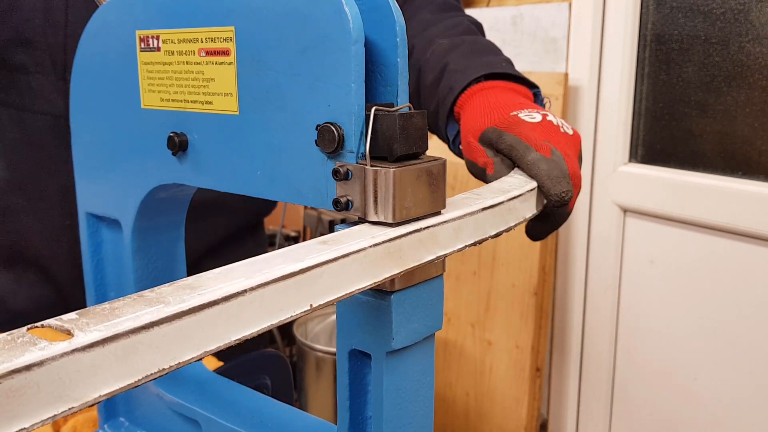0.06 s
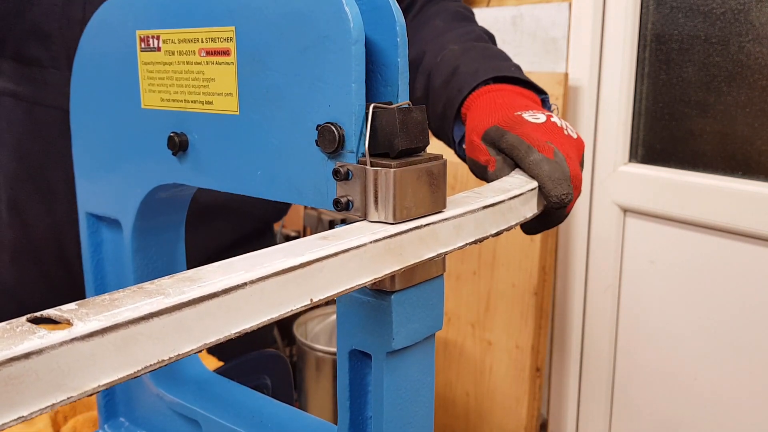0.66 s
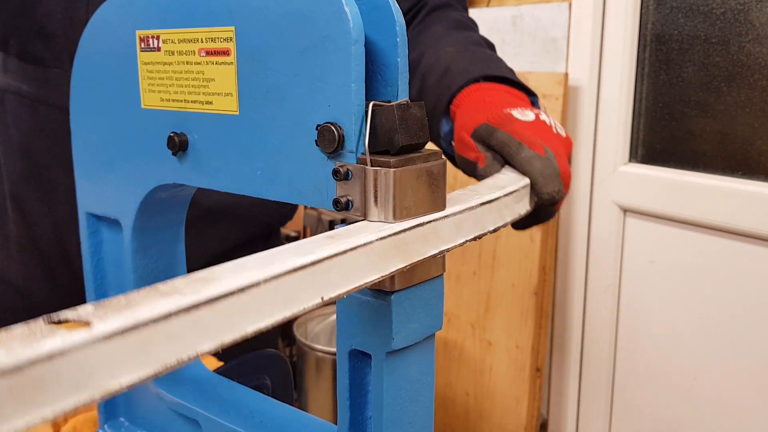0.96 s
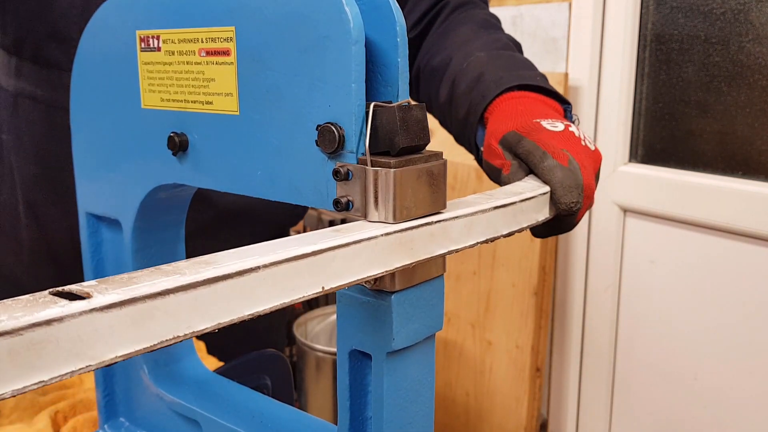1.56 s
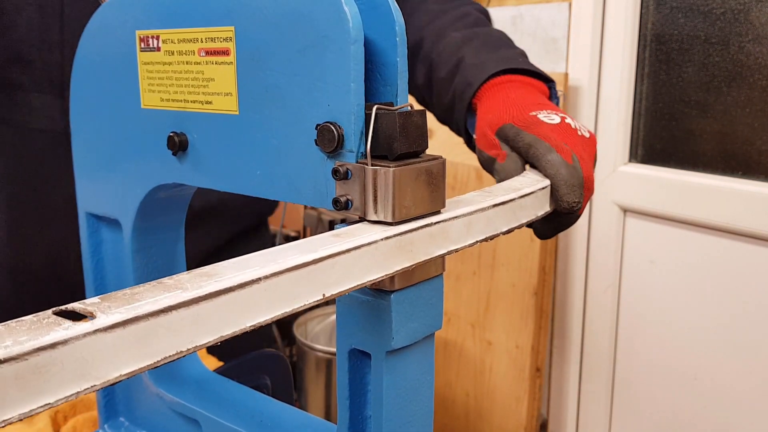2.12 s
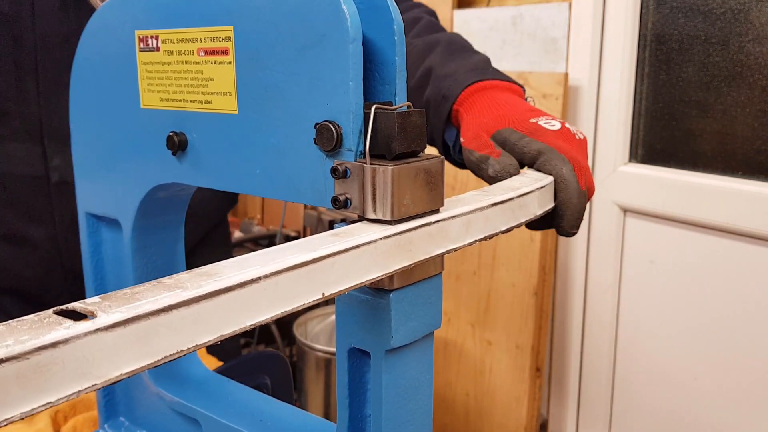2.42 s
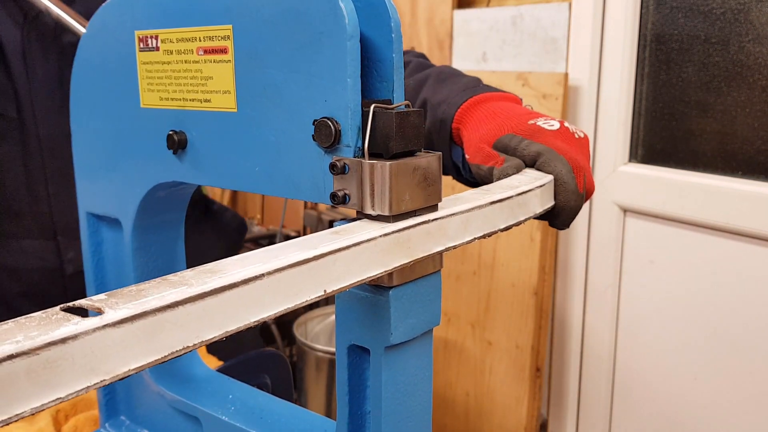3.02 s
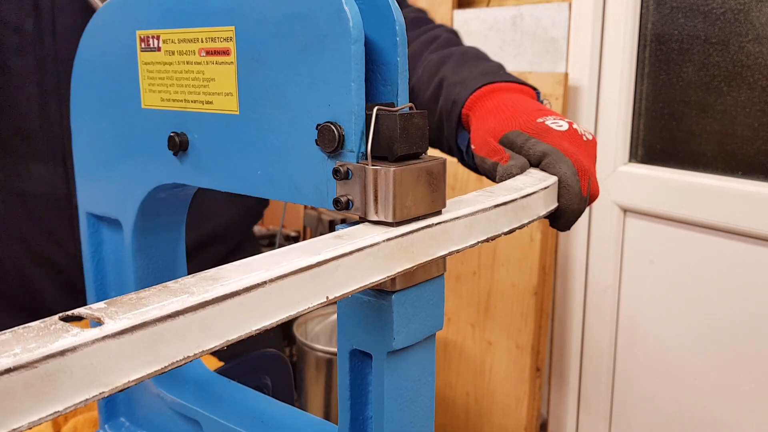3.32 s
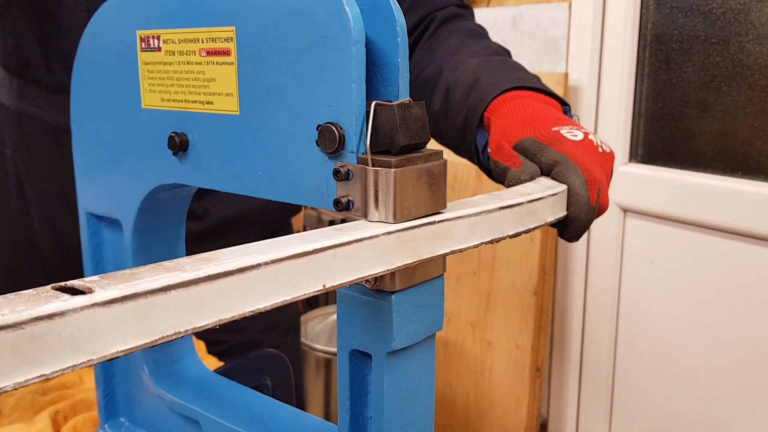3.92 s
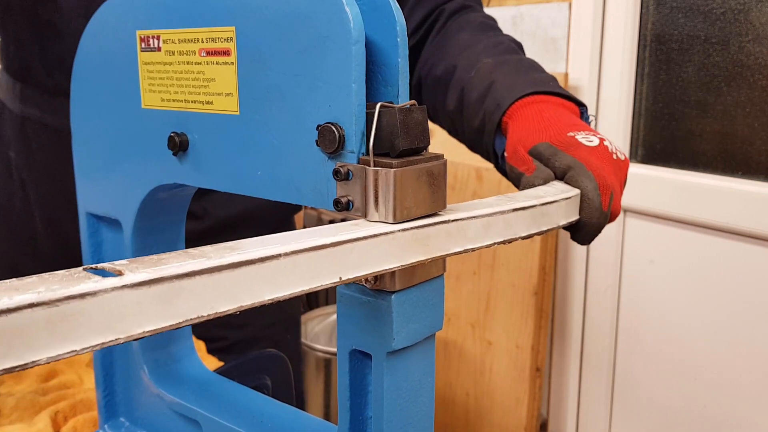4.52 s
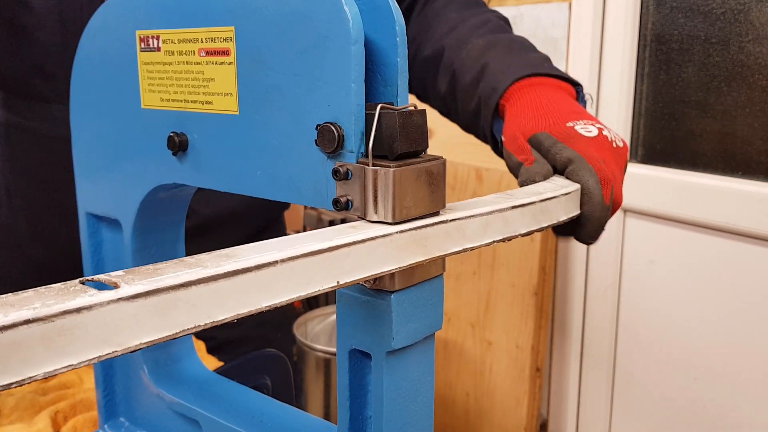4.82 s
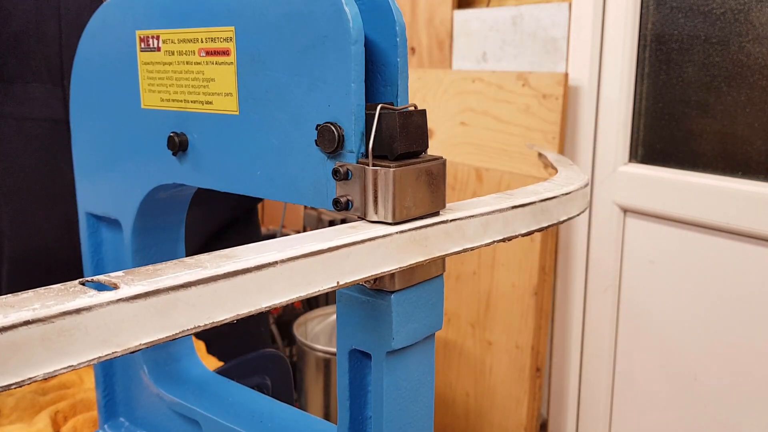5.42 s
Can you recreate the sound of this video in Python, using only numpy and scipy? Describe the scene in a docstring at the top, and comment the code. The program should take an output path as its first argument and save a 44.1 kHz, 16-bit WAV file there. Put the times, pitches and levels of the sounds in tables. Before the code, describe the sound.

A pedal-worked press bends a light metal profile, heard close in a small workshop. After a soft thud and a brief scrape, the steel jaws bite with a sharp double clunk and a low boom, then tick as the metal gives. The profile slides, with a clink, a thin squeal and a low pedal groan. Two more sharp clunks follow with a clink between them, ending in light ticks and a faint rising creak.

```python
"""Shrinker-stretcher in a small workshop

A pedal-worked press bends a light metal profile. On each hard stroke the steel jaws bite with
a clunk, then tick and creak as the metal gives; the cast frame thuds on its stand. Between
strokes the profile slides along the jaws with a hiss and one short squeal, loose jaw parts
clink and the pedal pivot groans."""
import sys
import numpy as np
from scipy import signal
from scipy.fft import rfft, irfft
from scipy.io import wavfile
from scipy.ndimage import uniform_filter1d

SR = 44100
rng = np.random.default_rng(int(sys.argv[2]) if len(sys.argv) > 2 else 0)


def file_out(sig):
    """Save sig as 16-bit WAV at sys.argv[1]."""
    # one column per channel
    cols = np.atleast_2d(sig).T
    # limit, then scale
    lim = np.clip(cols, -1, 1)
    pcm = np.round(lim * 32767).astype(np.int16)
    wavfile.write(sys.argv[1], SR, pcm)


N = 250002
T = np.arange(N) / SR
RING_T = T[:SR]  # one second for a hit to ring out

# room tone spectrum: f/Hz, level/dB
ROOM_COLOUR = [(25, -7.5), (50, -0.5), (85, 3.5), (200, -14.5), (400, -20), (800, -23.5), (1600, -25),
               (4000, -28.5), (7000, -23.5), (10000, -25), (15500, -30)]
# modes of the clamped profile: f/Hz, level/dB
PROFILE_MODES = [(406, -8.5), (550, -5.5), (592, -2.5), (680, -4.5), (710, -3.5), (923, 2), (1023, -9.5),
                 (1130, -3.5), (1530, 4), (1890, -8), (1974, -4.5), (2028, -7), (2159, -8), (2325, -2.5),
                 (2548, 3), (2900, 1.5), (3015, -3), (3893, 2.5), (4175, -3.5), (4730, -7), (6287, -8.5)]
# steel-on-steel spectrum: f/Hz, level/dB
STEEL_COLOUR = [(150, -5.5), (380, -7.5), (480, -9), (700, -6), (1100, 0.5), (1600, 2.5), (3200, 1.5),
                (4200, -2), (5500, -11.5), (7000, -13), (9500, -19), (11000, -32.5), (12800, -31),
                (15500, -45.5)]
# the jaws bite: t/s, crack level/dB, ring level/dB, tilt/(dB/octave), jaw f/Hz, jaw level/dB
JAW_BITES = [(.006, -41, -35, -6, 1640, -26.5), (0.0723, -55, -52, -2, 1630, -28.5),
             (.8659, -21.5, -25, 1, 3350, -22), (0.8904, -21.5, -26, -4, 3060, -16.5),
             (.923, -33, -32, -7.5, 661.5, -22), (3.541, -22, -29, 3, 6760, -19.5),
             (3.5429, -20.5, -28, 1.5, 2890, -16), (3.7496, -24, -32.5, -0.5, 3004, -11.5),
             (4.0123, -57, -38.5, -4, 990, -26.5), (4.472, -57, -48, -4, 1100, -35.5)]
# the metal slips between the loaded jaws: t/s, crack level/dB, jaw f/Hz, jaw level/dB
JAW_SLIPS = [(1.015, -38, 2980, -29), (1.0253, -31.5, 3580, -26), (1.0985, -38, 3015, -24),
             (1.2039, -47.5, 2950, -35.5), (1.2256, -47, 2840, -31), (1.236, -44.5, 2940, -33.5),
             (1.256, -43.5, 3130, -36.5), (1.3159, -45, 3310, -38.5), (3.958, -44.5, 2770, -33.5),
             (3.9866, -46, 2600, -38), (4.0048, -42, 2780, -23), (4.0717, -41, 3230, -29.5),
             (4.091, -58, 3340, -35), (4.143, -43, 3000, -34), (4.1488, -37.5, 3440, -32.5),
             (4.2122, -45, 3140, -36), (4.508, -37.5, 3030, -29.5)]
# pedal and linkage thuds: t/s, level/dB, hardness/(dB/octave)
PEDAL_THUDS = [(0.019, -30, 1), (0.084, -29, -2), (0.153, -48.5, -8.5), (0.894, -18.5, -1.5),
               (0.921, -32.5, 3.5), (1.291, -41, 13), (1.866, -40, 2.5), (2.117, -30, 3),
               (2.391, -35.5, -6), (2.855, -46, 14.5), (3.178, -42, -13.5), (3.425, -31, 0.5),
               (3.551, -34, 7), (3.769, -32, 7.5), (4.142, -37, 0), (4.184, -33, 7), (4.6, -38, 13.5)]
# modes of the frame on its stand: f/Hz, level/dB, t60/s
FRAME_MODES = [(68.2, -4.5, 1), (98.05, 5, 0.23), (115.5, 0.5, 0.21), (161.8, -3, 0.32), (191, -6.5, 0.33),
               (237.5, -15.5, 0.33)]
# spectrum of the stand's rumble: f/Hz, level/dB
STAND_COLOUR = [(25, -34.5), (48, -14.5), (66, 6.5), (82, 2), (102, 6), (135, -9.5), (175, -7.5),
                (240, -17.5), (400, -23.5), (700, -57.5)]
# long pedal pushes, one envelope each: t/s, grind level/dB, shake level/dB
PEDAL_STROKES = [
    [(0.98, -50, -46), (1.04, -42.5, -37), (1.154, -47, -41.5), (1.28, -45.5, -42.5), (1.682, -90, -58.5),
     (1.85, -80, -59)],
    [(3.46, -63, -37.5), (3.516, -85, -49), (3.548, -46.5, -33.5), (3.728, -51, -49.5), (3.768, -39.5, -41),
     (3.944, -60, -49), (3.96, -61, -50)],
    [(3.96, -46, -52), (3.986, -50, -59), (4.014, -42, -46), (4.078, -46, -40), (4.422, -49.5, -50),
     (4.682, -58.5, -46), (4.95, -97.5, -66.5)],
]
# the profile is shoved along the open jaws: t/s, attack/s, hold/s, hiss level/dB, grind level/dB
PROFILE_SHOVES = [(0.063, 0.017, 0.036, -37, -62), (1.901, 0.049, .005, -65.5, -64),
                  (2.105, .008, .03, -59, -52.5), (2.117, 0.041, 0.013, -49.5, -71),
                  (2.263, 0.029, 0.027, -56, -57), (2.341, 0.023, 0.039, -50, -69),
                  (2.44, 0.025, 0.046, -67, -80), (2.831, 0.037, 0.027, -64, -58),
                  (3.384, 0.025, 0.022, -71, -58.5), (4.796, 0.019, .035, -63.5, -92),
                  (4.962, 0.029, 0.014, -71, -70)]
# hiss spectrum of sliding metal: f/Hz, level/dB
SLIDE_COLOUR = [(150, 7.5), (350, 0), (600, -3.5), (1200, -6), (1480, -1), (1650, 5), (1850, -4),
                (2500, -1.5), (3700, 0.5), (5200, -12), (7000, -21), (10000, -33), (15000, -50)]
# grind spectrum of yielding metal: f/Hz, level/dB
YIELD_COLOUR = [(150, 12), (280, -7.5), (380, 9), (520, -1.5), (720, 1.5), (1100, 2), (1600, -6.5),
                (2300, -20.5), (3000, -9), (4000, -13.5), (5500, -25), (9000, -26), (15000, -56)]
# loose parts clink: t/s, level/dB, part (0 jaw block, 1 spring clip)
PART_CLINKS = [(2.3479, -26.5, 0), (3.3973, -44.5, 1), (3.424, -50.5, 1), (3.4824, -59, 1),
               (3.6658, -25.5, 1)]
# modes of the jaw block: f/Hz, level/dB, t60/s
BLOCK_MODES = [(1610, -12, 0.18), (2410, -17, 0.28), (2490, 8, 0.064), (2710, -12, 0.32), (2950, -1, 0.059),
               (3240, -1, 0.05), (3800, -8, 0.2), (4040, 5.5, 0.052), (4104, -6, 0.16), (4450, -13, 0.23),
               (12200, -36, 0.068)]
# modes of the spring clip: f/Hz, level/dB, t60/s
CLIP_MODES = [(2850, -14, .04), (3424, -16, .2), (3558, -14, .2), (4247, -19, .14), (4705, -9, .1),
              (5200, 2, .016), (5600, 3, .018), (6051, -14, .12), (8900, -8, .013), (12190, -8, .013)]
# squeal of the profile drawn over the lower jaw: t/s, f/Hz, level/dB
PROFILE_SQUEAL = [(2.35, 2345, -60), (2.375, 2335, -48), (2.49, 2320, -59), (2.515, 2320, -78)]
# falling groan of the pedal pivot: t/s, f/Hz, level/dB
PIVOT_GROAN = [(2.365, 270, -70), (2.383, 180, -40), (2.42, 135, -42), (2.48, 105, -42), (2.55, 89.6, -52),
               (2.66, 81, -76)]
# rising creak of the jaw teeth: t/s, f/Hz, level/dB
TEETH_CREAK = [(4.19, 1392, -72), (4.25, 1490, -47), (4.32, 1677, -51.5), (4.41, 1786, -50.5),
               (4.53, 1784, -57.5), (4.78, 1846, -83)]

TOP_HZ = 15750


def amp(db):
    """Decibels to gain."""
    return 10 ** (np.asarray(db) / 20)


def unit(x):
    """Scale to rms 1."""
    return x / np.sqrt(np.mean(x ** 2))


def add(out, start_s, x):
    """Mix x in at its cue."""
    i = max(int(start_s * SR), 0)
    out[i:i + len(x)] += x[:N - i]


def curve(rows, column):
    """Automation: straight lines between timed breakpoints."""
    rows = np.array(rows)
    return np.interp(T, rows[:, 0], rows[:, column])


def swell(rows, column=-1):
    """Gain envelope from a dB column, silent outside its breakpoints."""
    return amp(curve(rows, column)) * (T >= rows[0][0]) * (T <= rows[-1][0])


def colour(x, points, tilt_db=0):
    """EQ x to a spectrum, tilted per octave and rolled off below its first point; rms 1."""
    hz, db = np.transpose(points)
    bin_hz = np.maximum(np.fft.rfftfreq(len(x), 1 / SR), 1)
    tilted_db = db + tilt_db * np.log2(hz / hz[0])
    gain = amp(np.interp(np.log2(bin_hz), np.log2(hz), tilted_db))
    low_cut = np.minimum(bin_hz / hz[0], 1) ** 2
    return unit(irfft(rfft(x) * gain * low_cut, len(x)))


def band(x, lo_hz, hi_hz):
    """Gentle band-pass."""
    return signal.sosfilt(signal.butter(2, [lo_hz, hi_hz], "band", fs=SR, output="sos"), x)


def fade(t60, t=RING_T):
    """Exponential decay, 60 dB down after t60 seconds."""
    return np.exp(-np.log(1000) * t / t60)


def die_away(x, t60, damping):
    """Decay x octave by octave, the treble sooner; t60 holds at 1 kHz."""
    octave = np.clip(np.log2(np.fft.rfftfreq(SR, 1 / SR) / 1000 + 1e-9), -3, 4)
    spectrum = rfft(x)
    out = np.zeros(SR)
    for centre in range(-3, 5):
        share = np.maximum(1 - abs(octave - centre), 0)
        out += irfft(spectrum * share, SR) * fade(t60 * 2 ** (-damping * centre))
    return out


def ping(hz, t60):
    """One damped mode."""
    return np.sin(2 * np.pi * hz * RING_T) * fade(t60)


def ring(modes, tilt_db=0, scatter_db=0):
    """Struck modes of total weight 1; scatter varies their shares with the point of contact."""
    hz, db, t60 = np.transpose(modes)
    gain = amp(db + tilt_db * np.log2(hz / hz[0]))
    if scatter_db:
        gain *= amp(scatter_db * rng.standard_normal(len(hz))) * rng.choice([-1, 1], len(hz))
    return sum(g * ping(f, decay) for f, g, decay in zip(hz, gain, t60)) / np.linalg.norm(gain)


def room_tone():
    """A faint bed of air in the centre, with a thin hiss for stereo width."""
    mid = colour(rng.standard_normal(N), ROOM_COLOUR)
    mid /= np.std(band(mid, 300, TOP_HZ))  # level is set above the bass
    side = unit(band(rng.standard_normal(N), 5500, 17000))
    return amp(-74) * mid + amp(-79.5) * side * np.array([[1], [-1]])


def steel_noise(tilt_db):
    """One second of steel-on-steel contact noise."""
    return colour(rng.standard_normal(SR), STEEL_COLOUR, tilt_db)


def profile_ring(tilt_db=0):
    """The clamped profile rings; its higher modes die sooner."""
    modes = [(hz, db, 0.36 * (hz / 1000) ** -0.36) for hz, db in PROFILE_MODES]
    return ring(modes, tilt_db, scatter_db=1.8)


def jaw_hit(crack_db, ring_db, tilt_db, jaw_hz, jaw_db):
    """A crack, the stiff jaw's short note, then a tail from the whole press and the profile."""
    crack = steel_noise(tilt_db + 3.7) * fade(0.022)
    # the jaw rocks in three heavily damped modes
    note = ping(jaw_hz, t60=0.015)
    note += amp(-6) * ping(1.1 * jaw_hz, t60=0.0084)
    note += amp(-12.5) * ping(1.32 * jaw_hz, t60=0.0047)
    note *= 1 - fade(0.0017)
    press = die_away(steel_noise(tilt_db), t60=0.24, damping=0.18) * (1 - fade(0.012))
    tail = press + amp(-6.5) * profile_ring(tilt_db)
    return amp(crack_db) * crack + amp(jaw_db) * note + amp(ring_db) * tail


def jaws():
    """The jaws clunk as they bite and tick as the metal slips between them."""
    out = np.zeros(N)
    for start_s, *bite in JAW_BITES:
        add(out, start_s, jaw_hit(*bite))
    for start_s, crack_db, jaw_hz, jaw_db in JAW_SLIPS:
        tick = jaw_hit(crack_db, ring_db=crack_db - 4, tilt_db=-3, jaw_hz=jaw_hz, jaw_db=jaw_db)
        add(out, start_s, tick)
    return out


def pedal_load(part):
    """Gain of "grind" or "shake" while the pedal is down, smoothed over 20 ms."""
    column = {"grind": 1, "shake": 2}[part]
    gain = sum(swell(stroke, column) for stroke in PEDAL_STROKES)
    return abs(uniform_filter1d(gain, int(0.02 * SR) + 1))


def frame():
    """The heavy frame booms at each thud; its stand rumbles on and shakes under the pedal's load."""
    booms = np.zeros(N)
    settling = amp(-62.5 - 2.1 * T)  # faint rumble between blows
    rumble_power = settling ** 2 + pedal_load("shake") ** 2
    for start_s, db, hardness in PEDAL_THUDS:
        onset = amp(db) * (1 - fade(0.017))
        add(booms, start_s, onset * ring(FRAME_MODES, tilt_db=hardness))
        add(rumble_power, start_s, (onset * amp(-13.5) * fade(0.74)) ** 2)
    return booms + np.sqrt(rumble_power) * colour(rng.standard_normal(N), STAND_COLOUR)


def grains(spread_db):
    """Friction grit: dense tiny slips of unequal size, 32 samples each."""
    size = amp(spread_db * np.minimum(rng.exponential(size=N // 32 + 1), 5))
    return rng.standard_normal(N) * np.repeat(size, 32)[:N]


def shoves():
    """Hiss and grind envelopes: each shove gathers speed, holds and comes to rest."""
    hiss, grind = np.zeros(N), np.zeros(N)
    for start_s, attack_s, hold_s, hiss_db, grind_db in PROFILE_SHOVES:
        release_t = np.maximum(RING_T - attack_s - hold_s, 0)
        speed = np.minimum(RING_T / attack_s, 1) * fade(0.19, release_t)
        add(hiss, start_s, amp(hiss_db) * speed)
        add(grind, start_s, amp(grind_db) * speed)
    return hiss, grind


def friction():
    """Sliding hisses brightly; yielding under pressure grinds lower and rings the profile."""
    hiss_gain, grind_gain = shoves()
    grind_gain += amp(-2) * pedal_load("grind")
    hiss = hiss_gain * colour(grains(spread_db=2.1), SLIDE_COLOUR)
    grind = grind_gain * colour(grains(spread_db=2.4), YIELD_COLOUR)
    body = profile_ring()
    ringing = signal.fftconvolve(grind, body / np.linalg.norm(body))[:N]
    return hiss + amp(-1) * grind + amp(-22) * ringing


def loose_parts():
    """The jaw block and its spring clip snap into their seats; the light contact carries no bass."""
    out = np.zeros(N)
    for start_s, db, is_clip in PART_CLINKS:
        contact = unit(band(steel_noise(tilt_db=3.3), 1500, 13900))
        rattle = contact * (amp(-13.5) * fade(0.016) + amp(-24.5) * fade(0.14))
        clink = ring(CLIP_MODES if is_clip else BLOCK_MODES) + rattle
        add(out, start_s, amp(db) * band(clink, 1700, 15000))
    return out


def flutter(width_hz):
    """Random amplitude and phase of a resonance fed by uneven slips."""
    lowpass = signal.butter(2, width_hz, fs=SR, output="sos")
    wobble = signal.sosfilt(lowpass, grains(spread_db=2) + 1j * grains(spread_db=2))
    return wobble / np.std(wobble)


def stick_slip(glide, steady, width_hz):
    """Slips excite a gliding resonance; steady weights the pure tone of slips locked to it."""
    rough = flutter(width_hz) + 0.4 * flutter(3 * width_hz)
    phase = 2 * np.pi * np.cumsum(curve(glide, column=1)) / SR
    return swell(glide) * unit(np.real((steady + rough) * np.exp(1j * phase)))


def profile_squeal():
    """The profile sings a thin, high note as it is drawn over the lower jaw."""
    return stick_slip(PROFILE_SQUEAL, steady=1, width_hz=45)


def pivot_groan():
    """Stick-slip in the pedal pivot: a low, uneven note that falls as the lever slows."""
    return stick_slip(PIVOT_GROAN, steady=1.6, width_hz=34)


def teeth_creak():
    """The jaw teeth creak upwards; their slips also rasp in the stiff jaw's own range."""
    creak = stick_slip(TEETH_CREAK, steady=0.2, width_hz=85)
    rasp = swell(TEETH_CREAK) * unit(band(grains(spread_db=3.5), 2670, 3200))
    return creak + amp(-6.5) * rasp


def workshop(x, wet_db):
    """Close walls return a short, dense reverb."""
    echo = die_away(rng.standard_normal(SR), t60=0.22, damping=0.14) * (1 - fade(0.0067))
    return x + amp(wet_db) * signal.fftconvolve(x, echo / np.linalg.norm(echo))[:N]


def scene():
    """The press sits close and centred; frame and pivot stay dry."""
    squeaks = teeth_creak() + profile_squeal()
    hits = workshop(jaws(), wet_db=-8.5) + workshop(loose_parts(), wet_db=-8)
    scrapes = workshop(friction() + squeaks, wet_db=-6.5)
    return hits + scrapes + frame() + pivot_groan() + room_tone()


def record(dry):
    """Roll off the deepest bass and cut the top steeply."""
    low_cut = signal.butter(3, 42, "high", fs=SR, output="sos")
    high_cut = signal.ellip(10, 0.2, 70, TOP_HZ, fs=SR, output="sos")
    return signal.sosfilt(high_cut, signal.sosfilt(low_cut, dry))


dry = scene()
out = record(dry)
file_out(out)
```